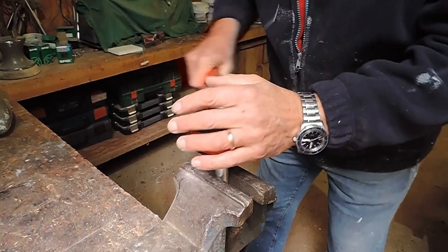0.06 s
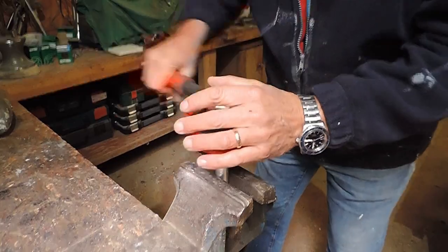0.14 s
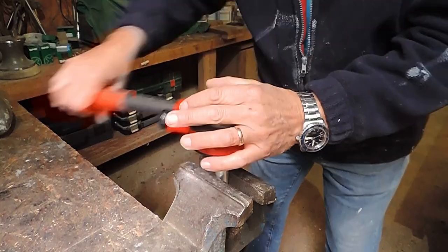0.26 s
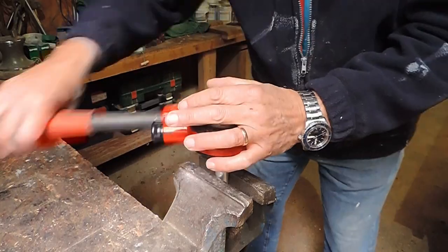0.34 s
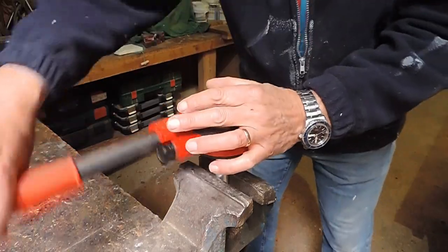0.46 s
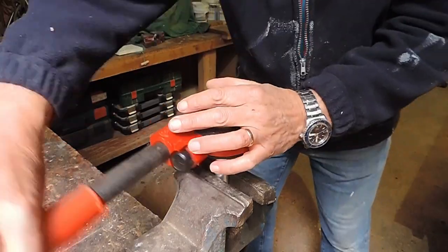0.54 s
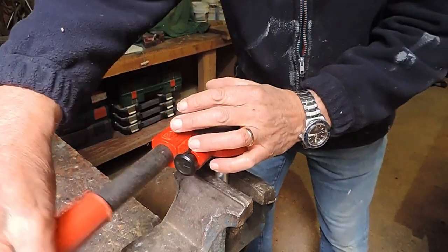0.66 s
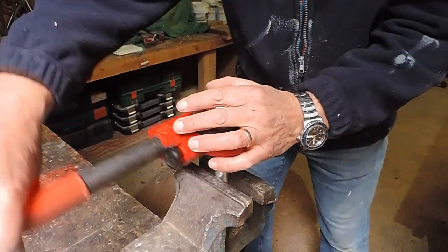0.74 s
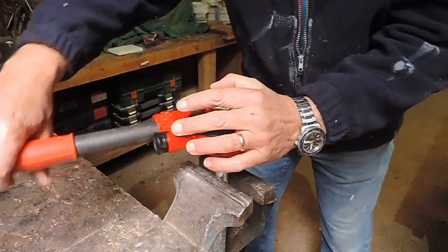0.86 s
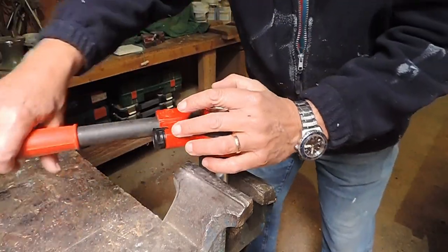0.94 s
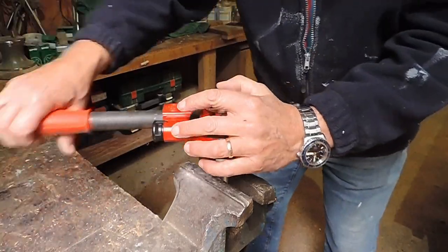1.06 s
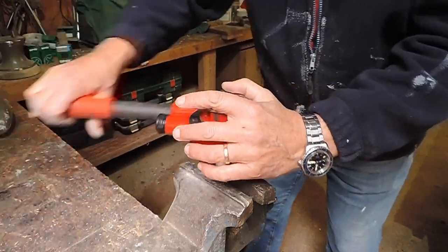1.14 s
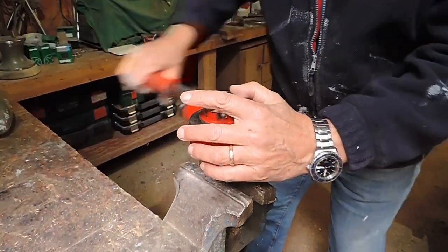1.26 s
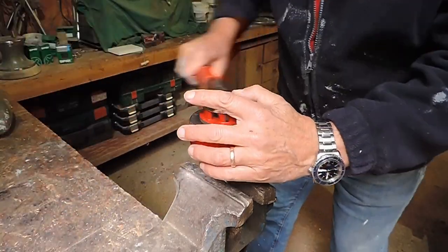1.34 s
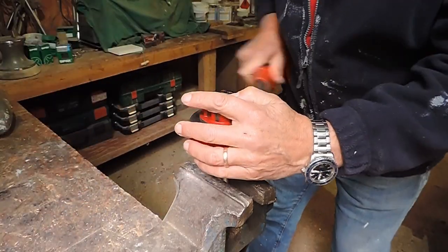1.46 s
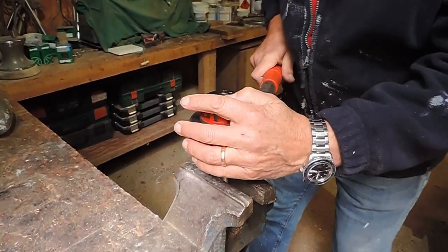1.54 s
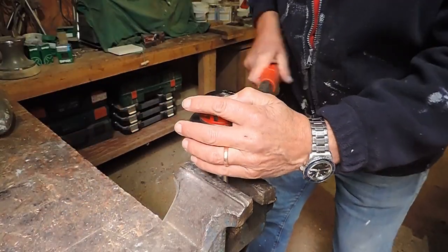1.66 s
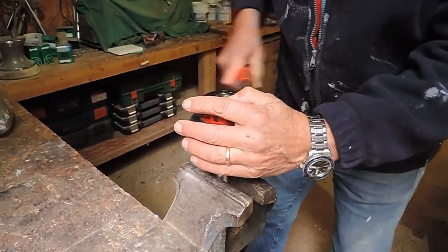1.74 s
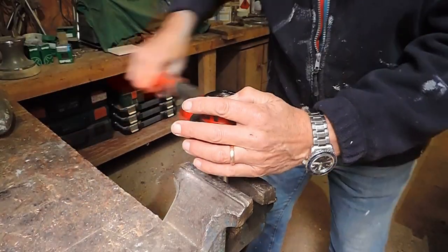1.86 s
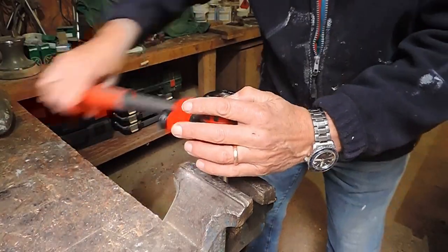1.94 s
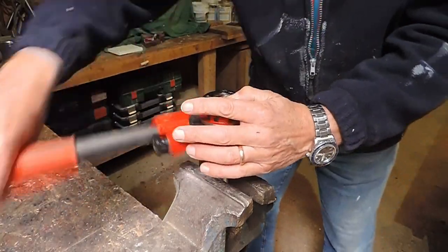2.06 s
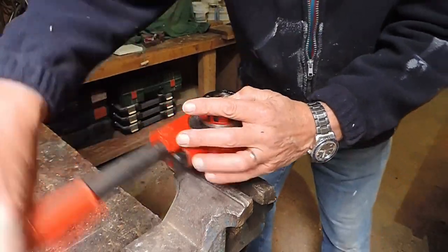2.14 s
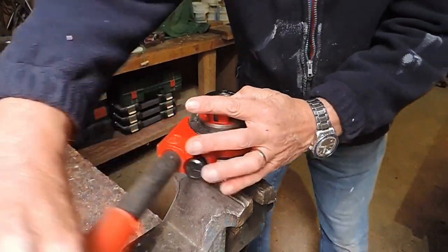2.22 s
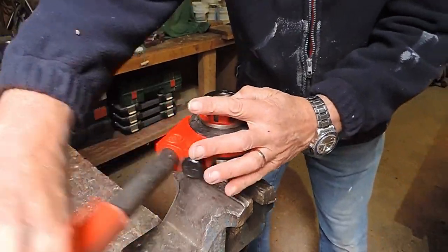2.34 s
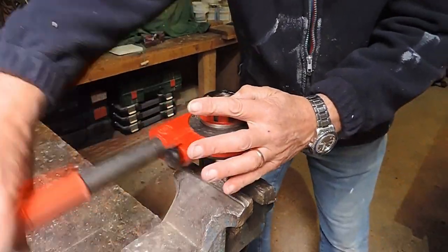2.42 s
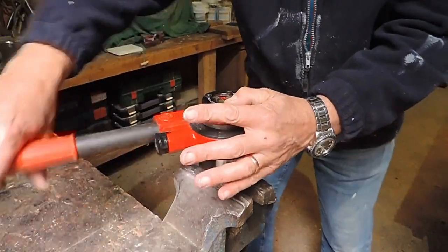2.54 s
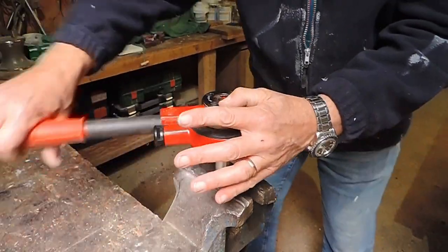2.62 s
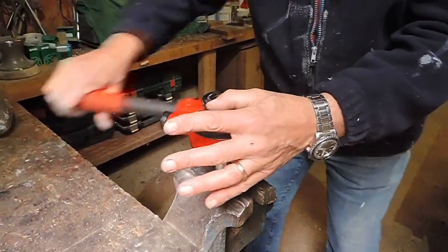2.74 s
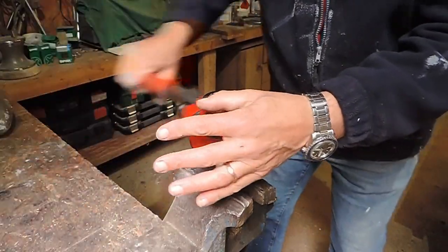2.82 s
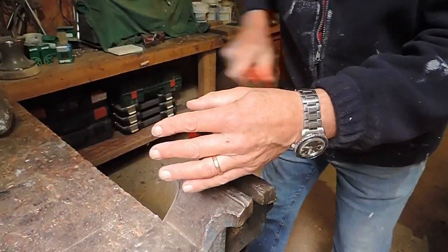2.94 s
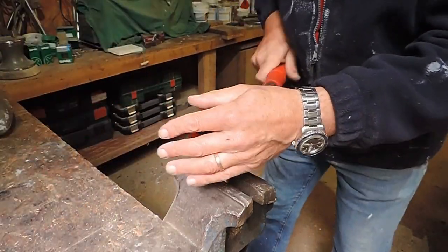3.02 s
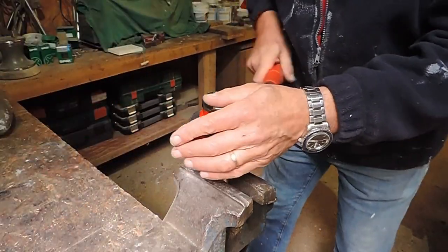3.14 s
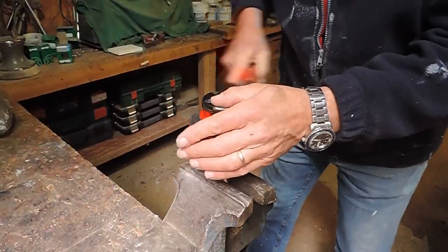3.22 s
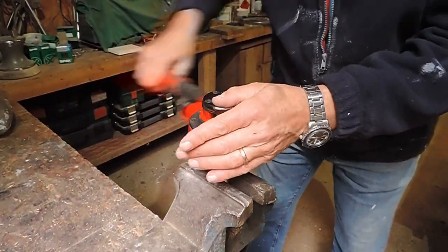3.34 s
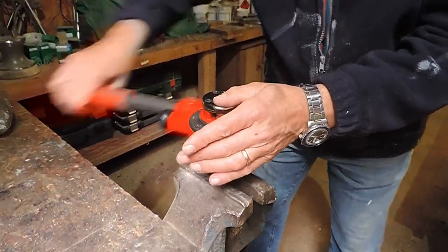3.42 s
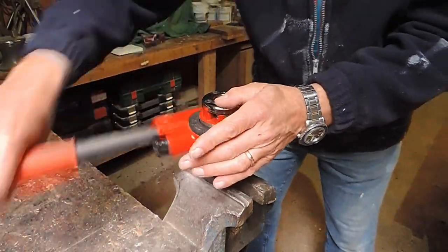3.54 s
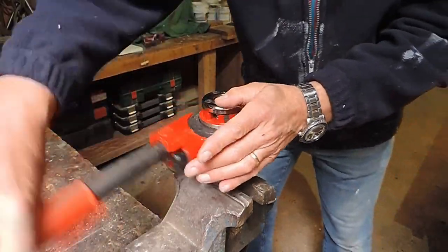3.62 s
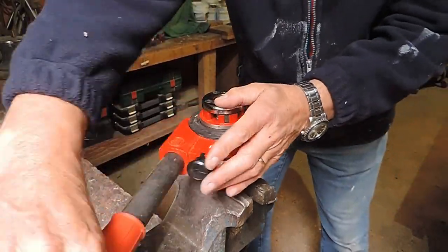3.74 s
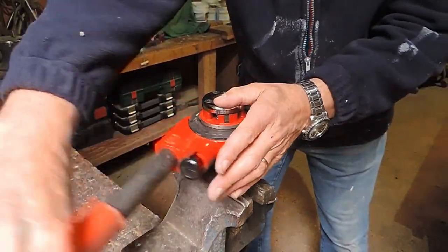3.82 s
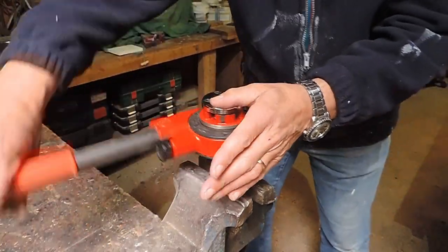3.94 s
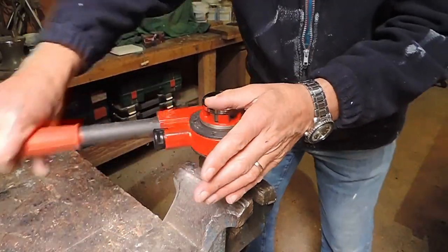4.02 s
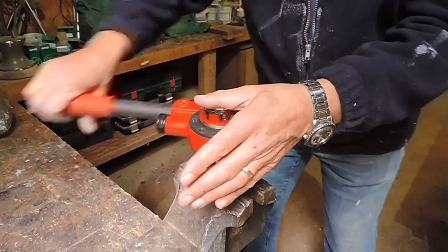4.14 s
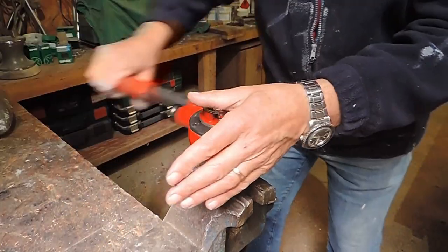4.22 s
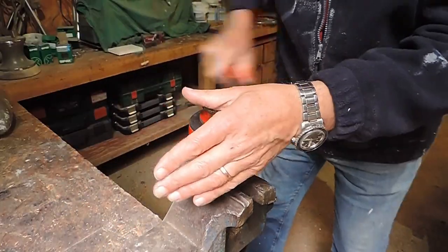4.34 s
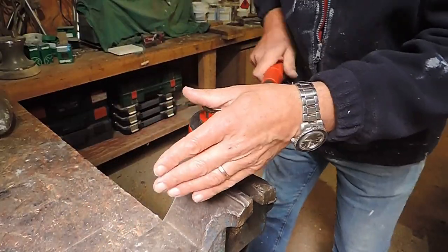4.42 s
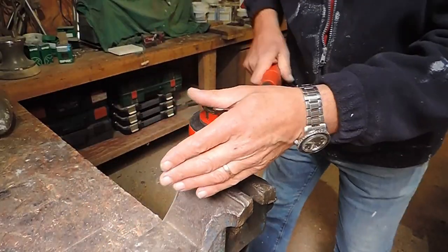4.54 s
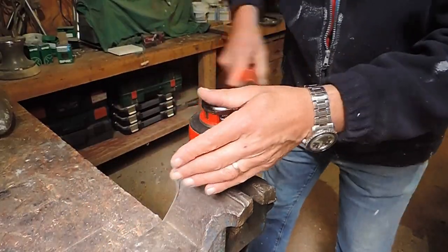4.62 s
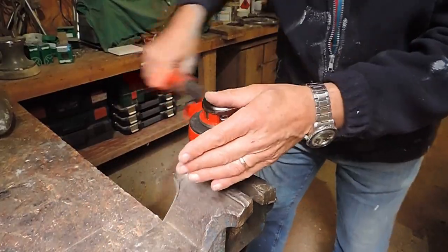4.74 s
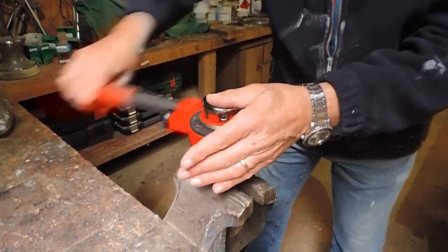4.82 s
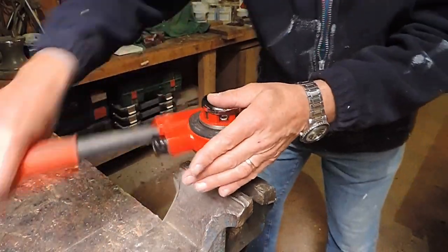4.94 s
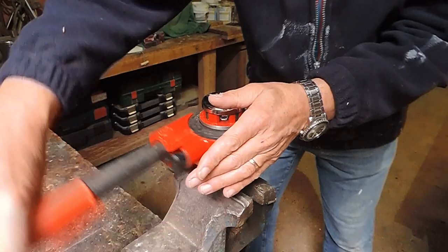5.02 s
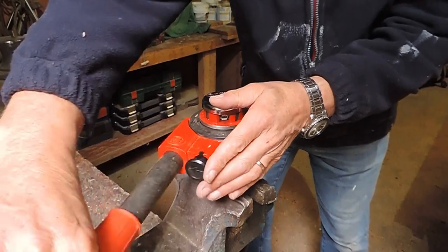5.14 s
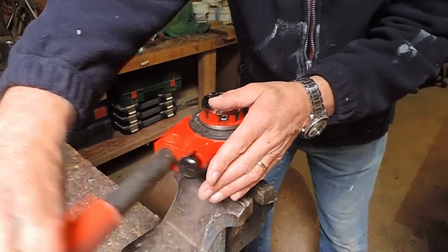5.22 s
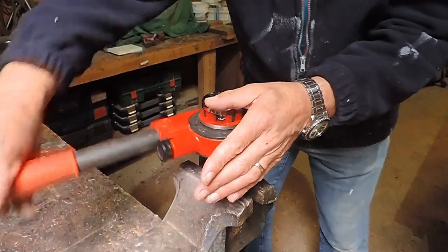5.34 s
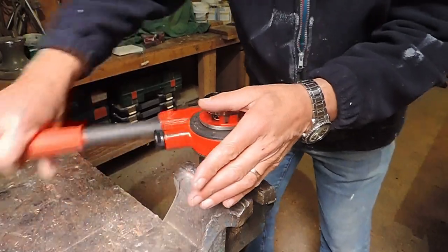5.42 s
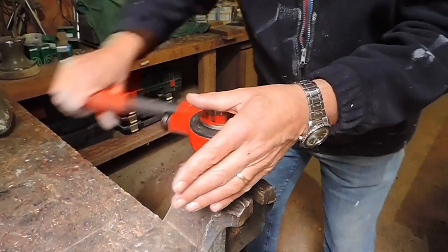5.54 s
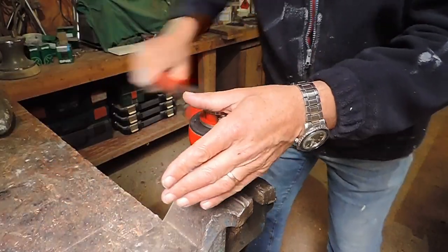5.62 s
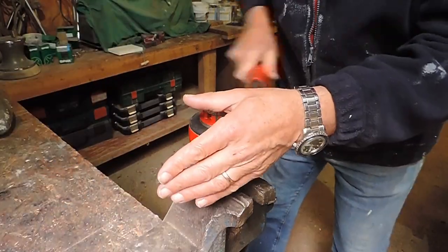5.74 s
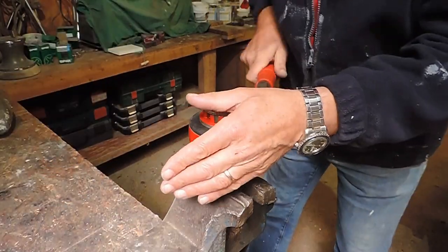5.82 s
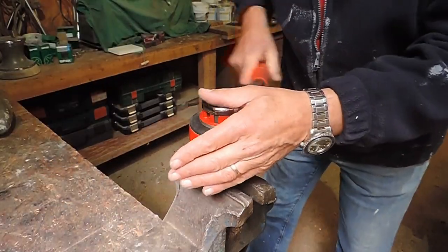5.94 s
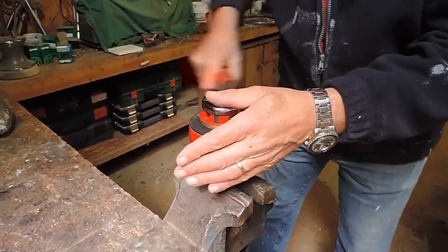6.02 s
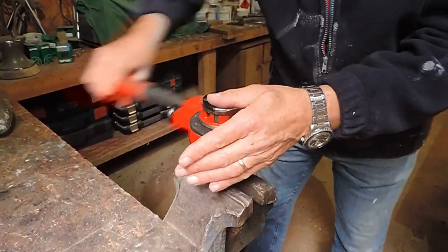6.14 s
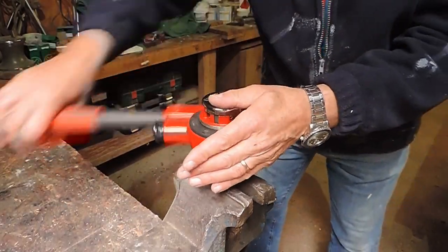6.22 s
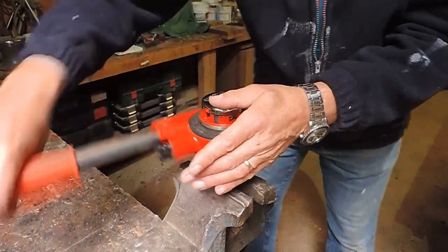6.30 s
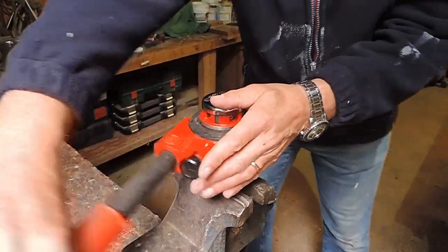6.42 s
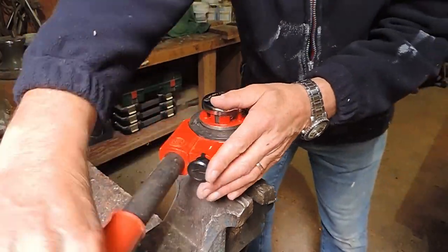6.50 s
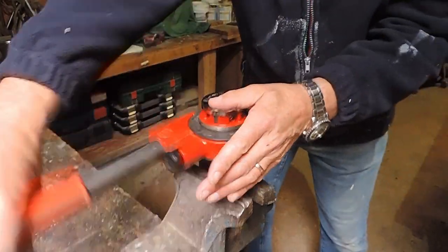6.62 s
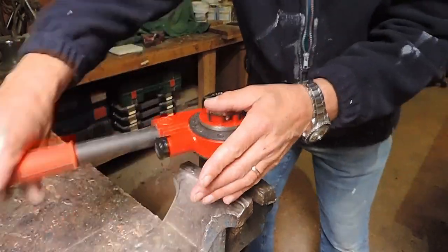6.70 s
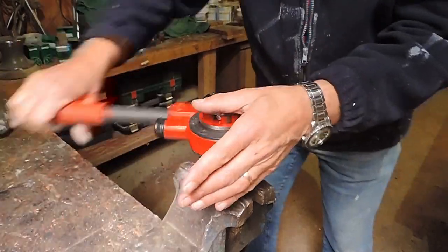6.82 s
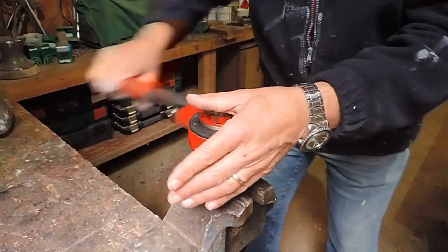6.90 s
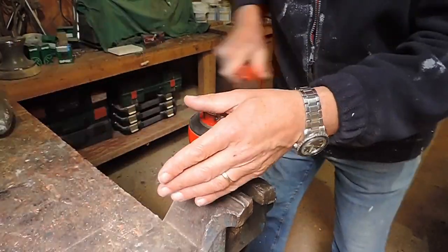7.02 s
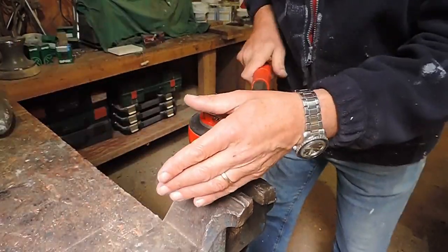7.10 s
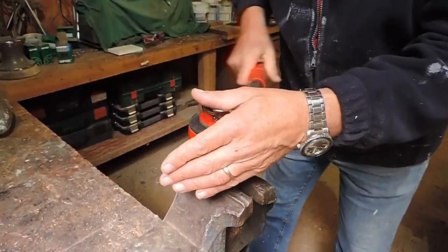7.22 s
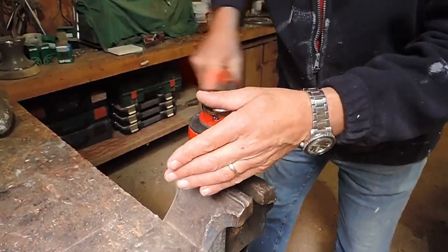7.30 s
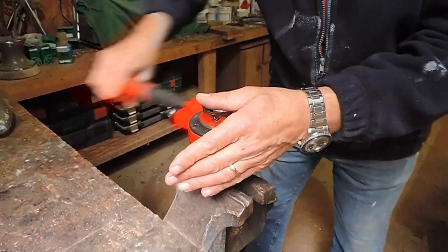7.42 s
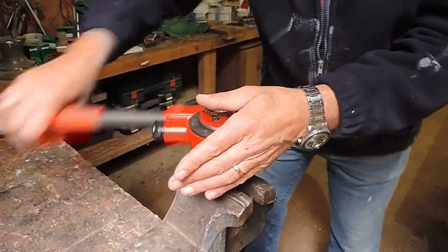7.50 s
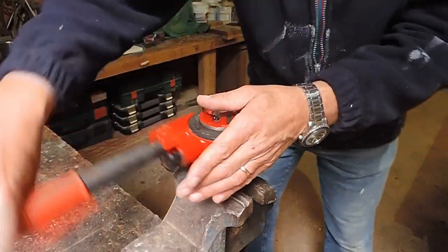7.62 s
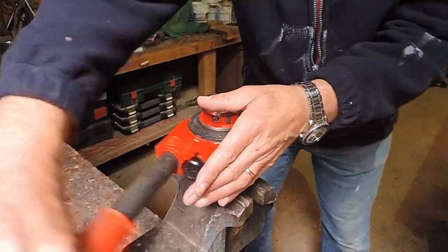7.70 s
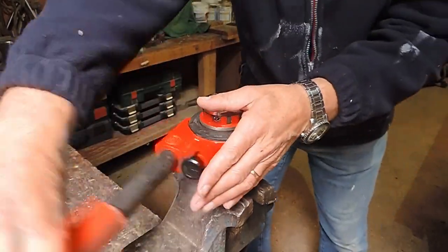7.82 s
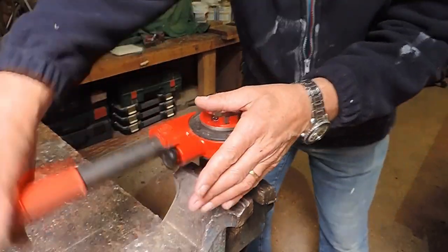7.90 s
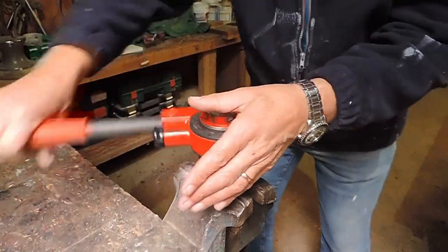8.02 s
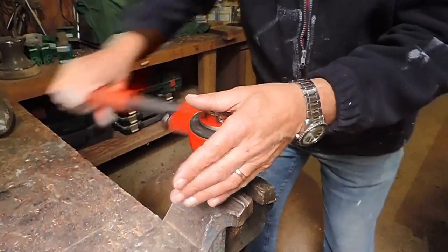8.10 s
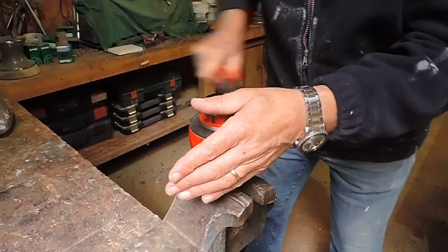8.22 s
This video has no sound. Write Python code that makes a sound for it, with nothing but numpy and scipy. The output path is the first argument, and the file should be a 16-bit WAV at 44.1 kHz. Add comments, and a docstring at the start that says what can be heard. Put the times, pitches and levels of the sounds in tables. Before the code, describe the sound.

A ratcheting pipe threader is swung back and forth on a steel bar in a bench vise, heard close up in a small workshop. Each free swing begins with a few ticks, a short scrape and a dull thump in the bench, followed by a quick run of four or five sharp, ringing metallic clicks, the loudest sounds here. The runs start at about 0.3, 1.9, 3.4, 4.8, 6.2 and 7.5 seconds, each lasting roughly a third of a second. After each, lighter ticks and a soft knock mark the pawl taking the load. The cutting swings are quiet, with faint rubbing and a hum from the vise slightly to the right, around 1.5, 3, 4.4, 5.8, 7.1 and 8.2 seconds. The room adds a short reverberation to the clicks, and a deep rumble and soft hiss lie behind the work.

```python
"""A small workshop, a stereo microphone close to a bench vise that holds a steel bar.
A ratcheting threader is swung to and fro on the bar. On the free swing the pawl snaps over the teeth
and rings the cast head; on the cutting swing the dies rub and the vise hums, a little to the right.
At each turn-round the slack is taken up with ticks, a scrape and a thump in the bench.
The room answers the snaps and ticks; a deep rumble and a soft hiss lie behind the work."""
import sys
import numpy as np
from scipy import signal
from scipy.fft import rfft, irfft, next_fast_len
from scipy.io import wavfile
from scipy.ndimage import uniform_filter1d, map_coordinates

SR = 44100
rng = np.random.default_rng(int(sys.argv[2]) if len(sys.argv) > 2 else 0)


def generate_wav(signal):
    """Clip the signal to [-1, 1] and save it as 16-bit WAV at the path in sys.argv[1]."""
    frames = np.transpose(np.atleast_2d(signal))
    scaled = np.clip(frames, -1, 1) * 32767
    pcm = np.round(scaled).astype(np.int16)
    wavfile.write(sys.argv[1], SR, pcm)


N = 364266

# pawl snaps: (time [s], level [dB], t60 of the contacts [s], ring near 3 kHz [dB], treble [dB])
SNAPS = [(0.2908, -11, .055, -2, 0.5), (0.3926, -12, 0.044, -3.5, -1.5), (0.4913, -12, 0.034, -4, -2.5),
         (0.62, -15, 0.021, 5, -0.5), (1.93, -10.5, 0.045, -2.5, -4.5), (2.0078, -9.5, 0.027, -4.5, 1),
         (2.087, -13.5, 0.033, 0.5, 3.5), (2.164, -18, 0.033, -3.5, 3), (2.255, -16, 0.025, -3.5, 0),
         (3.4142, -8.5, .036, -4, -0.5), (3.49, -17.5, 0.071, -7.5, -1), (3.567, -15.5, 0.036, -8.5, -5.5),
         (3.643, -16, 0.029, -7, -1), (3.732, -19, 0.029, 1, 5.5), (4.825, -11.5, 0.075, 4, 4.5),
         (4.901, -14.5, 0.031, -7, -1), (4.976, -17, 0.044, -13, -2), (5.0515, -16, 0.024, -1, -0.5),
         (5.1421, -14, 0.027, 5, 4.5), (6.1749, -12.5, 0.068, -1, 1.5), (6.2488, -14.5, .059, -6, 0),
         (6.323, -13.5, 0.06, 5.5, 7), (6.4012, -14, 0.022, -2, 3), (6.4987, -17, 0.015, 2, -5.5),
         (7.469, -12, 0.064, -4.5, -1), (7.5438, -16.5, 0.055, -6, 1.5), (7.614, -17, 0.034, -4, 2.5),
         (7.687, -18.5, 0.026, -2.5, -3.5), (7.773, -19, 0.034, -10.5, -0.5)]
# ticks of slack taken up: (time [s], peak [dB], centre [Hz])
TICKS = [(0.112, -40, 2260), (0.178, -25, 2170), (0.1865, -22, 2200), (0.283, -38, 2300),
         (0.7865, -42.5, 2530), (0.8196, -48, 2170), (0.8465, -45, 2260), (0.8851, -34, 2170),
         (1.784, -37, 1230), (1.8045, -26, 3100), (1.8143, -22.5, 2750), (1.8546, -33, 1350),
         (2.4673, -45, 2410), (2.4933, -38.5, 2700), (2.531, -37, 2400), (3.2833, -29.5, 1210),
         (3.2922, -30, 2150), (3.318, -27.5, 900), (3.335, -30, 2350), (3.406, -33, 1770),
         (3.9557, -36.5, 2510), (3.961, -37.5, 1000), (4.6896, -35, 1590), (4.72, -25, 1380),
         (4.727, -22.5, 2200), (4.819, -30, 2200), (5.3342, -35, 2400), (5.356, -43, 1850),
         (5.391, -40, 2360), (6.002, -40.5, 1950), (6.056, -39, 1900), (6.0848, -24.5, 2230),
         (6.168, -29, 2270), (6.666, -44, 2410), (6.6864, -44.5, 2070), (7.3043, -40, 1100),
         (7.3552, -35, 2300), (7.378, -32.5, 1050), (7.401, -32, 820), (7.3973, -43, 2250),
         (7.459, -34.5, 2190), (7.9303, -34, 2960), (7.9447, -37.5, 1220), (7.963, -40, 1910),
         (7.9796, -47, 2110)]
# thumps in the bench: (time [s], level [dB], leading mode [Hz], t60 of the push [s])
THUMPS = [(0.116, -32, 377, 0.017), (0.192, -21, 412, 0.038), (0.212, -32, 196, 0.021),
          (0.242, -26.5, 192, 0.044), (0.262, -30, 168, .02), (0.817, -40.5, 111, 0.035),
          (0.884, -24, 374, 0.014), (1.306, -37.5, 188, 0.033), (1.778, -37, 99, 0.035),
          (1.836, -26, 417, 0.026), (1.853, -20.5, 233, 0.036), (1.885, -28, 297, 0.024),
          (2.429, -51, 174, 0.037), (2.533, -30.5, 322, 0.0067), (3.218, -44.5, 170, .05),
          (3.283, -28, 272, 0.015), (3.318, -26, 300, 0.041), (3.338, -18, 280, 0.017),
          (3.364, -34, 260, 0.024), (3.902, -45, 111, 0.037), (3.938, -43, 299, 0.033),
          (4, -25.5, 186, 0.022), (4.63, -33.5, 253, 0.032), (4.692, -30, 263, 0.037),
          (4.708, -27, 194, 0.013), (4.724, -24, 411, 0.05), (4.741, -17.5, 201, 0.027),
          (4.758, -31, 258, 0.025), (5.32, -41.5, 251, 0.03), (5.395, -30, 251, 0.0092),
          (6.001, -36, 172, 0.03), (6.064, -28, 400, 0.037), (6.101, -18.5, 292, 0.017),
          (6.124, -24, 260, 0.053), (6.691, -37.5, 432, 0.015), (6.723, -36, 170, 0.031),
          (6.74, -37, 147.3, 0.025), (7.298, -37.5, 248, 0.068), (7.355, -36, 260, 0.061),
          (7.382, -25.5, 194, 0.01), (7.4, -18, 307, 0.031), (7.417, -25.5, 263, .04),
          (7.945, -35, 396, 0.018), (7.966, -31, 298, 0.012), (7.982, -26, 185, 0.0053)]
# the handle starts its free swing: (time [s], bench shudder [dB], head scrape [dB], rumble [dB])
RELEASES = [(0.198, -36, -42, -46), (1.823, -35.5, -41.5, -44.5), (3.311, -36.5, -45, -47),
            (4.709, -33.5, -39.5, -43.5), (6.095, -36, -43, -46), (7.391, -36, -40.5, -48.5)]
# the pawl bites and takes the load: (time [s], bench shudder [dB], head scrape [dB], vise hum [dB])
BITES = [(0.891, -42, -55, -60.5), (2.538, -52, -61, -57.5), (4.009, -43.5, -53, -59.5),
         (5.402, -48.5, -52, -57.5), (6.721, -50, -52, -62.5), (7.989, -43, -47, -58)]
# cutting swings: (time of greatest force [s], length [s], rubbing [dB], bench shudder [dB])
CUTS = [(0.0, 0.36, -63, -54), (1.456, 0.61, -51, -47.5), (3.003, 0.42, -54.5, -52.5),
        (4.434, 0.45, -54, -52), (5.762, 0.45, -53, -49), (7.078, 0.42, -58, -53.5),
        (8.25, 0.2, -54.5, -52)]
# resonances of head, handle, vise, scraping head and bench: (frequency [Hz], width [Hz], level [dB])
HEAD_MODES = [(1430, 800, -19), (2004, 90, -12.5), (2260, 400, -10.5), (2723, 37, 1), (3072, 363, 7.5),
              (3396, 140, 0.5), (6200, 1200, -18), (8286, 90, 0), (12040, 310, -12), (13770, 79, -1),
              (15100, 240, -15.5)]
HANDLE_MODES = [(770, 22, -10.5), (1105, 30, -14.5), (1360, 33, -15), (1960, 25, -6.5), (2420, 86, -12.5),
                (2975, 40, -4), (3020, 25, 2), (3210, 60, -5), (8300, 70, -10), (12000, 130, -12),
                (13650, 60, -13), (15000, 90, -20.5)]
VISE_MODES = [(629, 22, 0), (678, 26, -1), (745, 15, -6), (868, 33, -11.5), (924, 47, -7),
              (1114.3, 21, -4.5), (1200, 58, -17.5), (1525, 700, -30)]
SCRAPE_MODES = [(740, 300, -1.5), (1050, 200, 5.5), (1420, 110, 5), (1850, 119, 8), (2400, 470, 4),
                (2850, 600, -16)]
BENCH_MODES = [(106.6, 26.4, 1.5), (167, 11, 3), (188.2, 10.5, 2.5), (251.6, 19, 0), (297.3, 21, -1),
               (382.3, 41, -1), (457, 100, -6), (793, 110, -10.5)]
# spectra of the pawl's crack and of the background hiss: (frequency [Hz], level [dB])
CRACK_SPECTRUM = [(290, -30.5), (500, -9.5), (2010, -16), (3020, -11), (3650, -10.5), (12100, -20),
                  (15300, -21), (16500, -30)]
HISS_SPECTRUM = [(760, -53.5), (1300, 6.5), (1470, 4.5), (3210, -1.5), (9870, -10.5), (13800, -9.5),
                 (16000, -23.5)]
# band of a snap's ring: (frequency [Hz], share of the ring level [0-1])
RING_BAND = [(2500, 0), (2800, 1), (3500, 1), (3800, 0)]
# a snap's phase at the microphone: (frequency [Hz], left ahead of right [rad])
SNAP_PHASE = [(300, 1.6), (2000, 0.085), (3200, 1.54), (5000, 2), (13500, 0.94)]
# a snap's balance at the microphone: (frequency [Hz], left over right [dB])
SNAP_BALANCE = [(1400, -1), (3000, -2), (5500, 3), (9000, -2.5), (13000, 2)]
# stereo likeness of the sustained noises: (frequency [Hz], left-right correlation [0-1])
ALIKE = [(40, .8), (130, .96), (300, .95), (650, .75), (1400, .35), (3000, .1)]
# reverberation of the workshop: (frequency [Hz], t60 [s])
SHOP = [(200, 0.091), (1400, 0.18), (3100, 0.27), (5000, 0.24), (10000, 0.13)]

# swell shapes: (rise [dB/s], hold [s], fall [dB/s])
RELEASE_SHUDDER, RELEASE_SCRAPE, RELEASE_RUMBLE = (310, 0.063, 58.6), (260, 0.037, 54), (41, 0.017, 190)
BITE_SHUDDER, BITE_SCRAPE, BITE_HUM = (280, 0.007, 108), (240, 0.0035, 290), (1500, 0.024, 81)


def amp(db):
    """Decibels to gain."""
    return 10 ** (np.asarray(db) / 20)


def unit(x):
    """Scaled to rms 1."""
    return x / np.sqrt(np.mean(x ** 2) + 1e-20)


def along(points, hz):
    """(Hz, value) points on a log axis."""
    f, v = np.transpose(points)
    return np.interp(np.log(hz + 1), np.log(f + 1), v)


def wobble(rate):
    """A smooth random curve, rate knots a second."""
    return map_coordinates(rng.standard_normal(int(N * rate / SR) + 4), [np.arange(N) * rate / SR])


def filtered(x, response):
    """x times a complex response of frequency."""
    n = x.shape[-1]
    m = next_fast_len(n + 2048)
    return irfft(rfft(x, m) * response(np.fft.rfftfreq(m, 1 / SR)), m)[..., :n]


def resonances(peaks):
    """Causal response of a row of resonances."""
    return lambda f: sum((-1) ** k * amp(db) * 1j * f * w / (c * c - f * f + 1j * f * w)
                         for k, (c, w, db) in enumerate(peaks))


def pair(response, grain_db, rate):
    """Stereo noise of rms 1 in uneven lumps, alike in the bass."""
    def mid_side(hz):
        turn = np.arccos(np.clip(along(ALIKE, hz), -1, 1)) / 2
        return response(hz) * [np.cos(turn), np.sin(turn)]
    mid, side = filtered(amp(grain_db * wobble(rate)) * rng.standard_normal((2, N)), mid_side)
    return unit(np.array([mid + side, mid - side]))


def swells(times, levels_db, shape):
    """Gain of swells that rise, hold and fall, summed as power."""
    rise, hold, fall = shape
    t = np.arange(N) / SR
    return np.sqrt(sum(amp(db - rise * np.maximum(s - t, 0) - fall * np.maximum(t - s - hold, 0)) ** 2
                       for s, db in zip(times, levels_db)))


def add(out, s, x):
    """Mixes x into out from time s."""
    part = out[:, round(s * SR):][:, :x.shape[1]]
    part += x[:, :part.shape[1]]


def pawl(linger_db=-12.5, linger_t60=0.3, wash_db=-10.5):
    """Close up, each snap is a blow and a chatter of contacts that ring the cast head and the handle."""
    out, t = np.zeros((2, N)), np.arange(SR // 4) / SR
    sides = np.array([[.5], [-.5]])
    crack = lambda hz: amp(along(CRACK_SPECTRUM, hz))
    handle_tone = lambda hz: resonances(HANDLE_MODES)(hz) + amp(wash_db) * crack(hz)
    for start, db, t60, ring_db, treble_db in SNAPS:
        def at_mic(hz):
            tone_db = along([(4000, 0), (6000, treble_db)], hz) + ring_db * along(RING_BAND, hz)
            phase = sides * along(SNAP_PHASE, hz)
            return amp(tone_db + sides * along(SNAP_BALANCE, hz)) * np.exp(1j * phase)
        head = resonances([(hz, width, level + rng.normal(0, 1.5)) for hz, width, level in HEAD_MODES])
        # the head radiates unevenly, so each channel hears its own share
        chatter = rng.standard_normal(len(t)) + .5 * rng.standard_normal((2, len(t)))
        contacts = amp(-60 * t / t60) * chatter
        contacts[:, 8] += 3.5  # the blow itself
        # the pawl lands once more a moment later
        bounce_db, bounce_s = rng.normal(-17.5, 4.4), rng.uniform(0.0082, 0.0091)
        contacts += amp(bounce_db) * np.roll(contacts, round(SR * bounce_s), axis=1)
        snap = filtered(contacts, lambda hz: (head(hz) + crack(hz)) * at_mic(hz))
        linger = amp(linger_db - 60 * t / linger_t60) * rng.standard_normal((2, len(t)))
        handle_ring = filtered(linger, lambda hz: handle_tone(hz) * at_mic(hz))
        peak = np.sqrt(2 * uniform_filter1d(snap[:, :SR // 20] ** 2, 90).max())
        add(out, start, shop(amp(db) * snap[:, :SR // 10] / peak, wet_db=-9.5))
        add(out, start, amp(db) * handle_ring / peak)
    return out


def slack(t60=0.029, vise_db=-4.5):
    """Loose parts meet: a sharp knock around one centre, a faint bright edge and a ring of the vise."""
    out, t = np.zeros((2, N)), np.arange(SR // 10) / SR
    for start, db, centre in TICKS:
        noise = rng.standard_normal(len(t)) + .5 * rng.standard_normal((2, len(t)))
        body, vise = resonances([(centre, 500, 0), (5000, 6000, -29)]), resonances(VISE_MODES)
        tick = filtered(amp(-60 * t / t60) * noise, lambda hz: body(hz) + amp(vise_db) * vise(hz))
        add(out, start, shop(amp(db) * tick / np.abs(tick).max(), wet_db=-8))
    return out


def handle(cut_edge_db=16.5, rumble_rest_db=-79):
    """The handle lets go, bites and cuts: gains of shudder, hum, scrape, rumble and rubbing."""
    t = np.arange(N) / SR
    release_s, release_shudder_db, release_scrape_db, rumble_db = np.transpose(RELEASES)
    bite_s, bite_shudder_db, bite_scrape_db, bite_hum_db = np.transpose(BITES)
    cut_s, length, rub_db, strain_db = np.transpose(CUTS)[:, :, None]
    force_db = -cut_edge_db * (2 * (t - cut_s) / length) ** 2
    rub = amp(force_db + rub_db).max(axis=0)
    strain = amp(force_db + strain_db).max(axis=0)
    loose = swells(release_s, release_shudder_db, RELEASE_SHUDDER)
    shudder = loose + swells(bite_s, bite_shudder_db, BITE_SHUDDER) + strain
    hum = rub + amp(-21) * loose + swells(bite_s, bite_hum_db, BITE_HUM)
    scrape = swells(release_s, release_scrape_db, RELEASE_SCRAPE) + amp(-14.5) * rub
    scrape += swells(bite_s, bite_scrape_db, BITE_SCRAPE)
    rumble = swells(release_s, rumble_db, RELEASE_RUMBLE) + amp(rumble_rest_db) + amp(-13) * shudder
    return shudder, hum, scrape, rumble, rub


def bench(shudder, recoil_db=-34, shove=0.7, attack_s=0.0006, low_cut_hz=222):
    """Soft pushes and the pawl's recoil ring the bench; the force on the handle makes it shudder."""
    out, t = np.zeros((2, N)), np.arange(SR // 5) / SR
    wood, vise = resonances(BENCH_MODES), resonances(VISE_MODES)
    recoils = [(start, recoil_db, 280, .02) for start, *_ in SNAPS]
    for start, db, lead_hz, t60 in THUMPS + recoils:
        def radiated(hz):
            # where the push lands decides which modes lead
            body = wood(hz) * (0.5 + resonances([(lead_hz, 45, 0)])(hz))
            ring = resonances([(lead_hz, 16, -5)])(hz) + amp(-9) * vise(hz)
            return (body + ring) * 1j * hz / (low_cut_hz + 1j * hz)
        grit = rng.standard_normal(len(t)) + .15 * rng.standard_normal((2, len(t)))
        push = amp(-60 * t / t60) * (1 - np.exp(-t / attack_s)) * (shove + grit)
        thud = filtered(push, radiated)
        add(out, start, amp(db) * thud / np.abs(thud).max())
    return out + shudder * pair(wood, grain_db=3, rate=60)


def dies(hum, scrape):
    """Cutting friction drives the vise's resonances; the loose head scrapes in grains."""
    vise = pair(resonances(VISE_MODES), grain_db=2, rate=46)
    grit = pair(resonances(SCRAPE_MODES), grain_db=4.5, rate=80)
    return hum * vise + scrape * grit


def shop(x, wet_db):
    """A short sound with the room's answer, each frequency dying at its own speed."""
    hz, t, z = signal.stft(rng.standard_normal((2, SR // 4)), SR, nperseg=256)
    tail = signal.istft(z * amp(-60 * t / along(SHOP, hz)[:, None]), SR, nperseg=256)[1]
    wet = signal.fftconvolve(np.pad(x.mean(0), (round(0.0036 * SR), 0))[None],
                             tail / np.linalg.norm(tail[0]), axes=1)
    return amp(wet_db) * wet + np.pad(x, ((0, 0), (0, wet.shape[1] - x.shape[1])))


def background(rumble, rub, hiss_db=-54, dip_db=6, recovery_s=0.7, swish_db=-13):
    """A deep uneven rumble; the hiss sinks with every snap, climbs slowly back and swells on the cuts."""
    snaps = np.bincount([round(start * SR) for start, *_ in SNAPS], minlength=N)
    sink_db = dip_db * signal.lfilter([1], [1, -np.exp(-1 / (recovery_s * SR))], snaps)
    deep = pair(lambda hz: resonances([(42, 25, 0)])(hz) ** 2, grain_db=5.5, rate=22)
    hiss = pair(lambda hz: amp(along(HISS_SPECTRUM, hz)), grain_db=4, rate=6.7)
    return rumble * deep + (amp(hiss_db - sink_db) + amp(swish_db) * rub) * hiss


def scene():
    """The tool close in front, bench and vise a little right of the microphone, the room behind."""
    shudder, hum, scrape, rumble, rub = handle()
    to_right = amp([[-.6], [.6]])
    return pawl() + slack() + to_right * (bench(shudder) + dies(hum, scrape)) + background(rumble, rub)


def record(dry):
    """The input stage rounds off the sharpest peaks; the microphone fades above 15 kHz, then cuts off."""
    ceiling, top_hz = .55, 16600
    rounded = ceiling * np.tanh(dry / ceiling)
    return filtered(rounded, lambda hz: amp(along([(14900, 1.0), (16200, -35.5)], hz)) * (hz < top_hz))


dry = scene()
out = record(dry)
generate_wav(out)
```